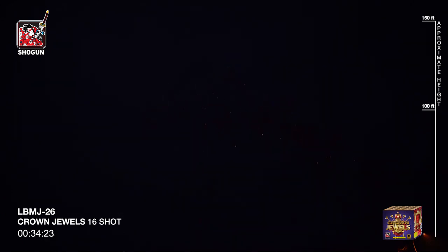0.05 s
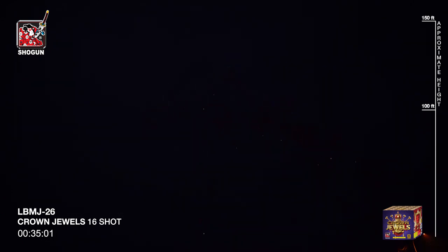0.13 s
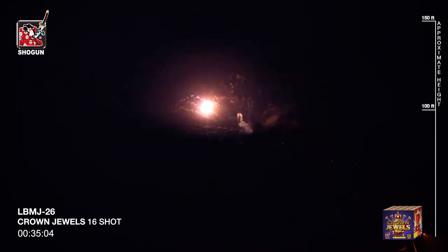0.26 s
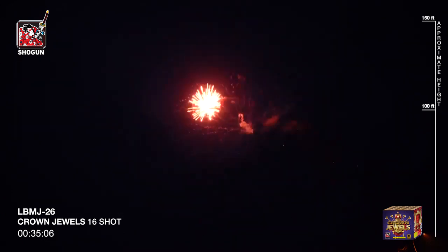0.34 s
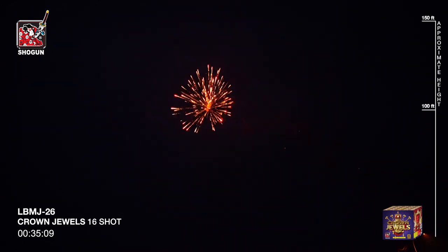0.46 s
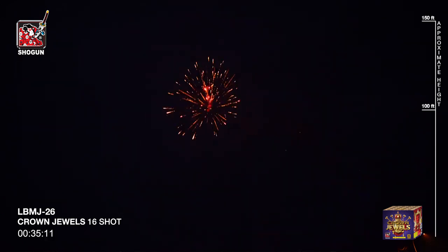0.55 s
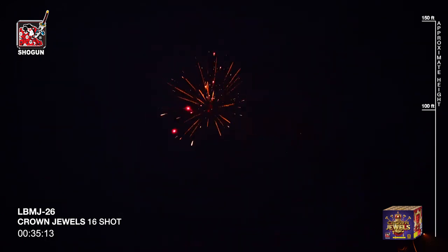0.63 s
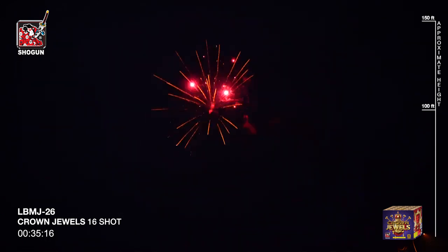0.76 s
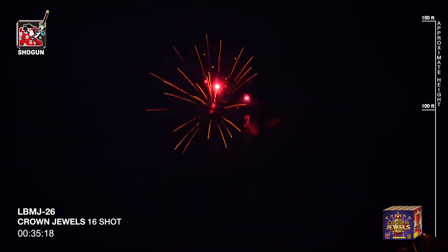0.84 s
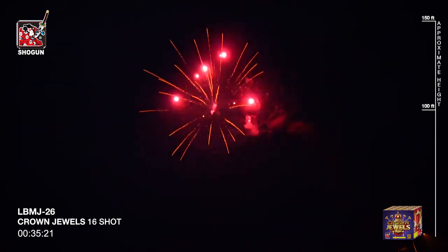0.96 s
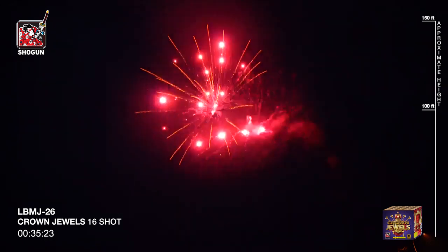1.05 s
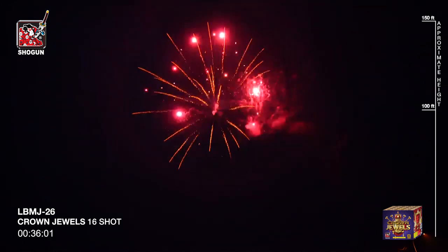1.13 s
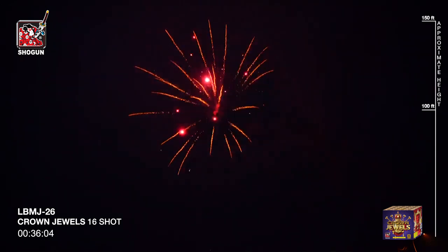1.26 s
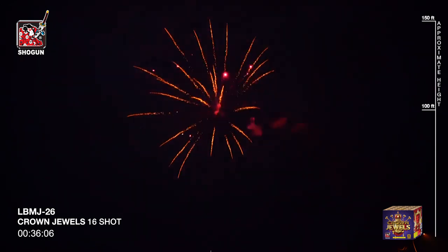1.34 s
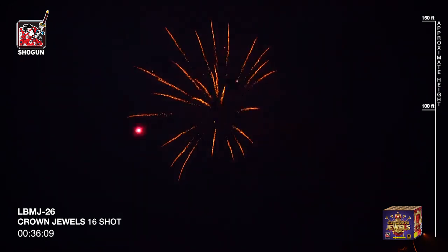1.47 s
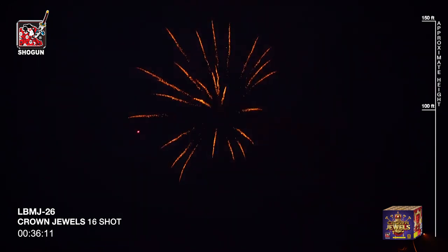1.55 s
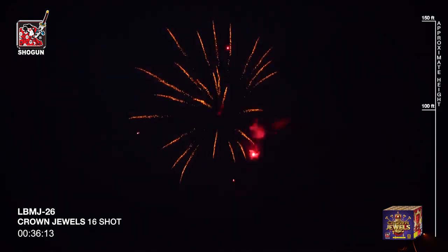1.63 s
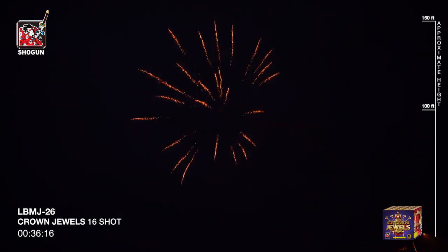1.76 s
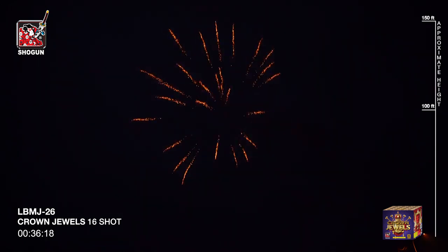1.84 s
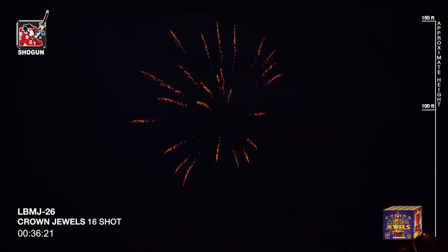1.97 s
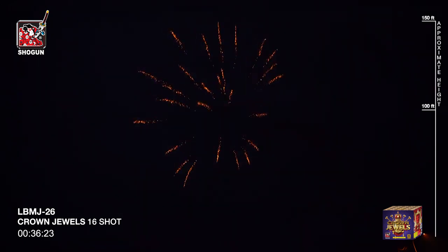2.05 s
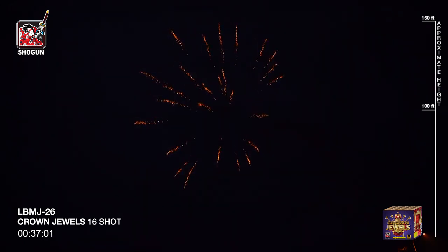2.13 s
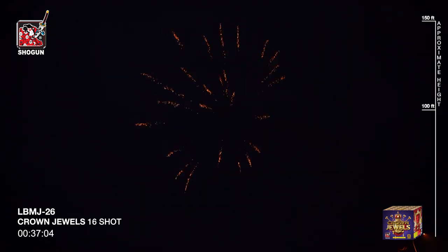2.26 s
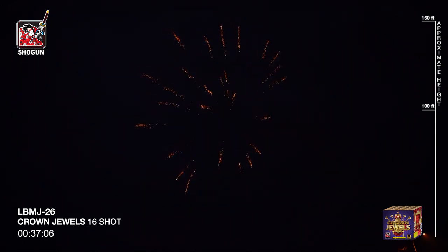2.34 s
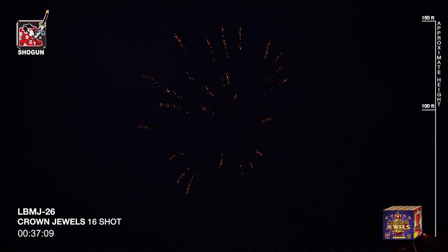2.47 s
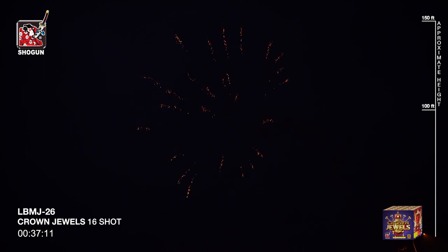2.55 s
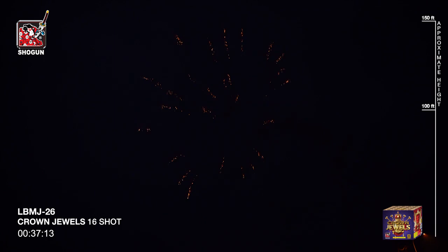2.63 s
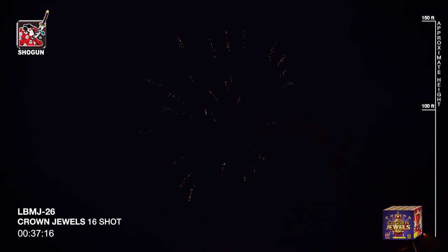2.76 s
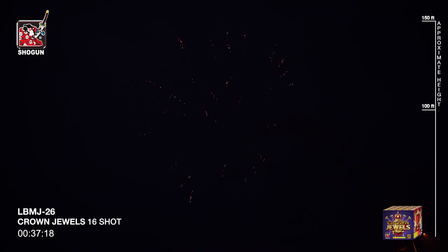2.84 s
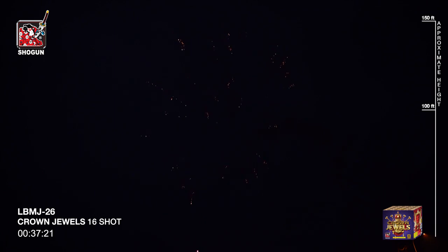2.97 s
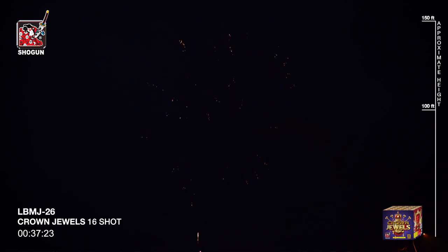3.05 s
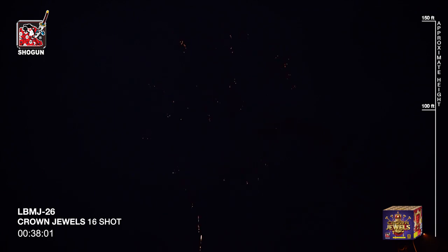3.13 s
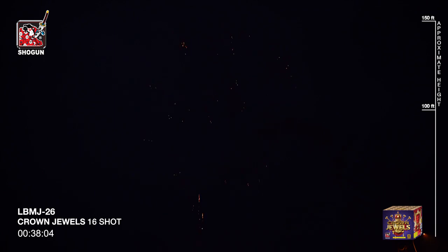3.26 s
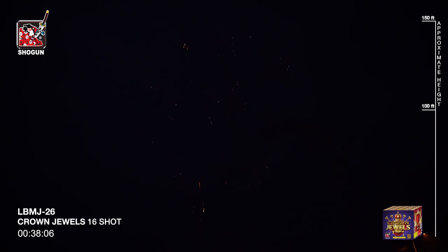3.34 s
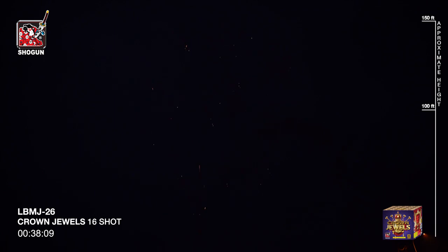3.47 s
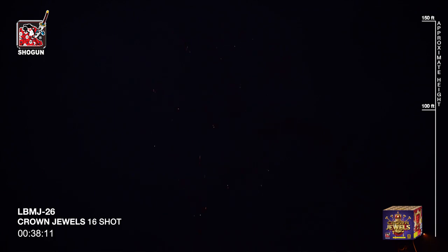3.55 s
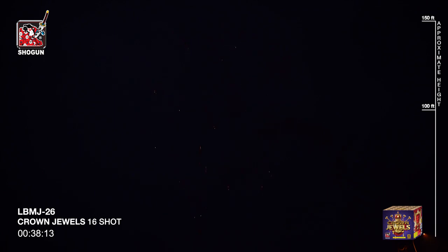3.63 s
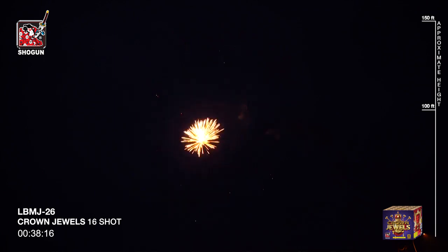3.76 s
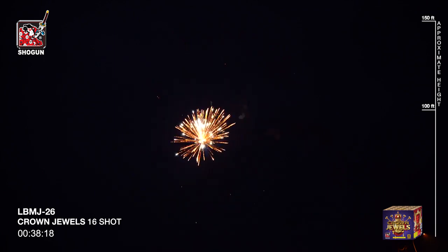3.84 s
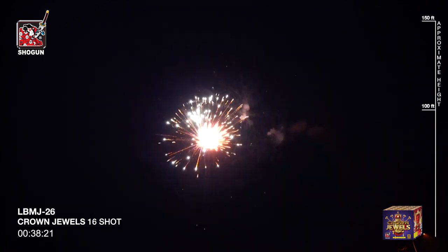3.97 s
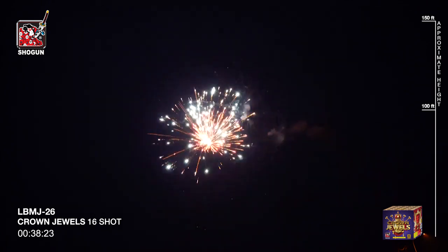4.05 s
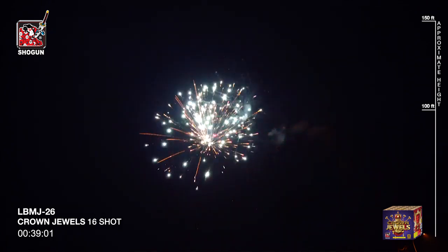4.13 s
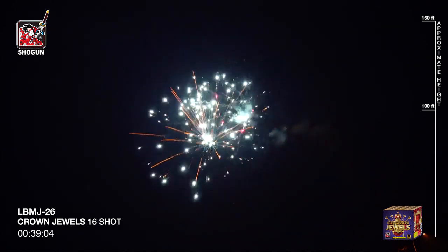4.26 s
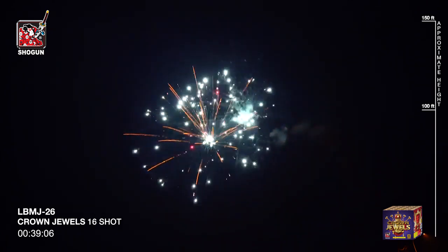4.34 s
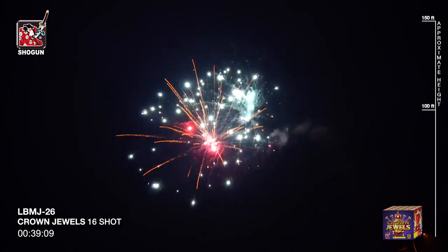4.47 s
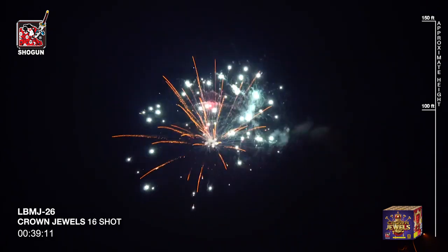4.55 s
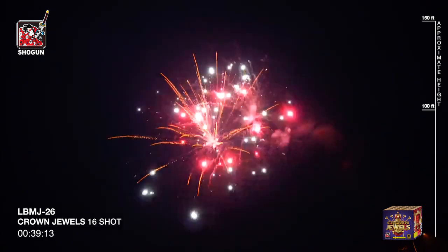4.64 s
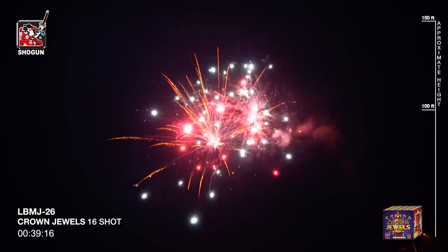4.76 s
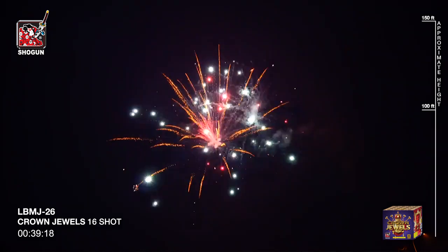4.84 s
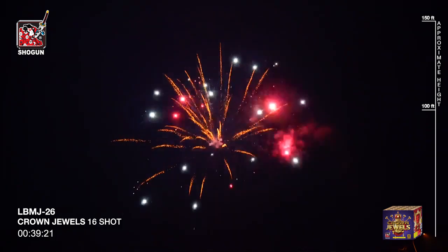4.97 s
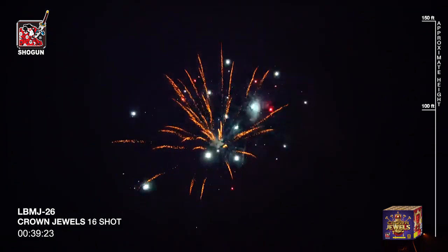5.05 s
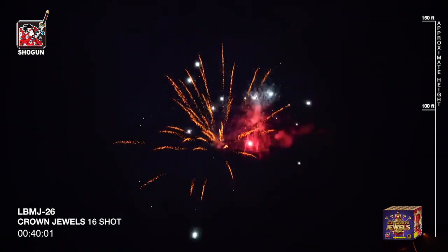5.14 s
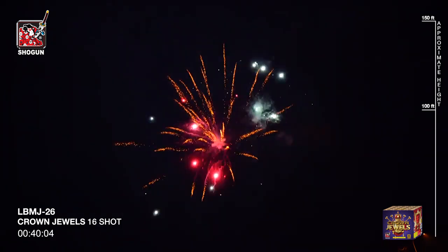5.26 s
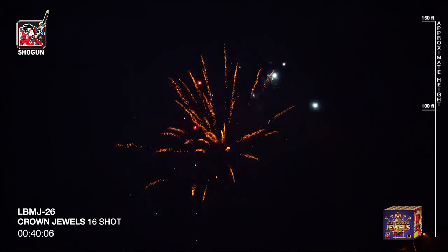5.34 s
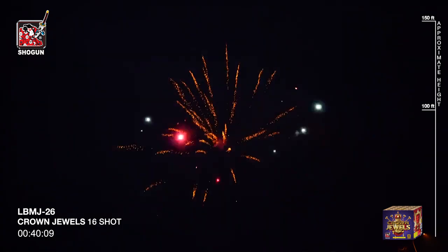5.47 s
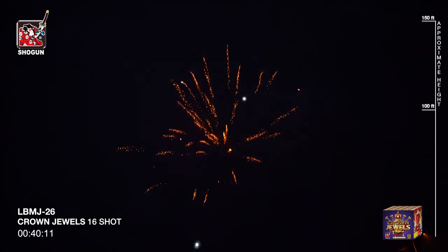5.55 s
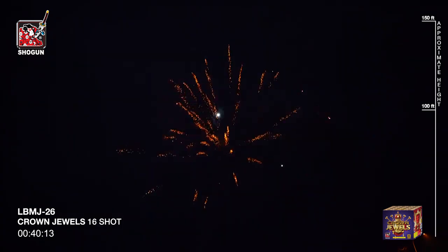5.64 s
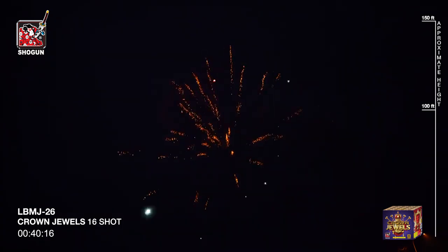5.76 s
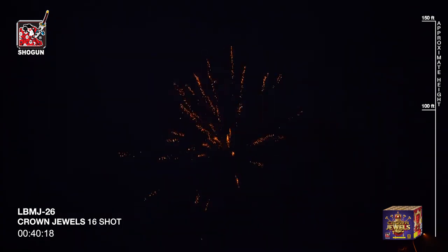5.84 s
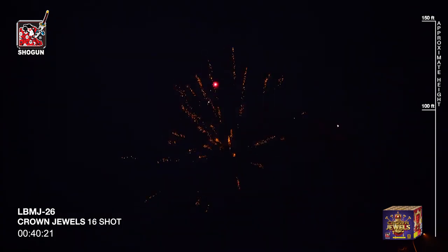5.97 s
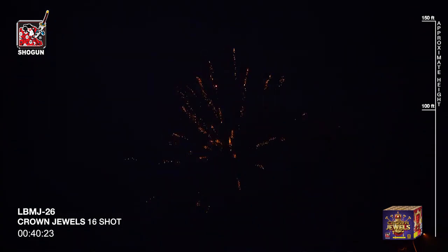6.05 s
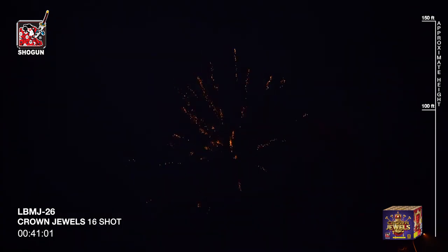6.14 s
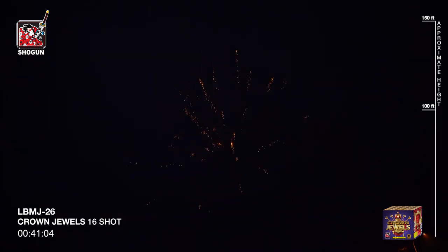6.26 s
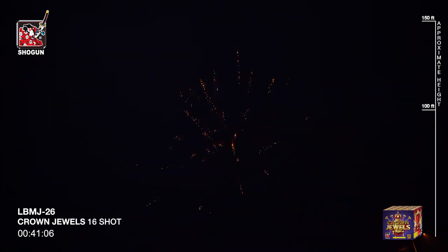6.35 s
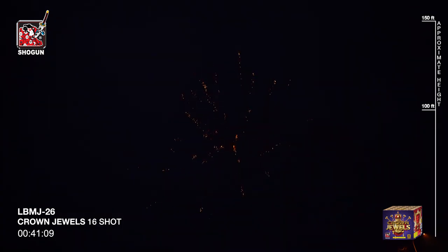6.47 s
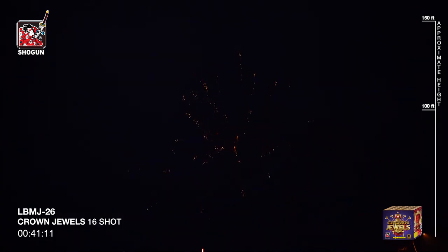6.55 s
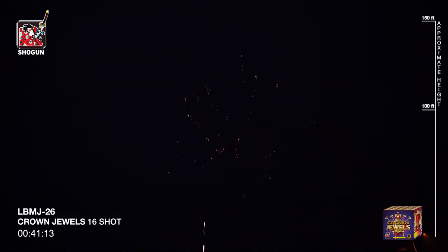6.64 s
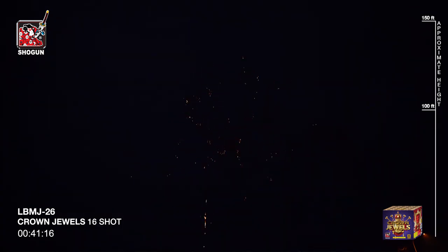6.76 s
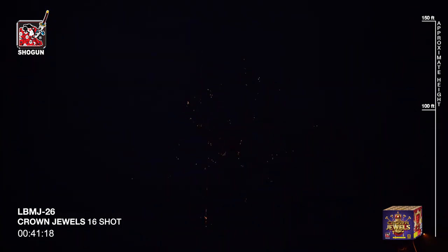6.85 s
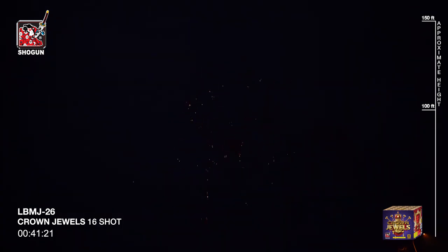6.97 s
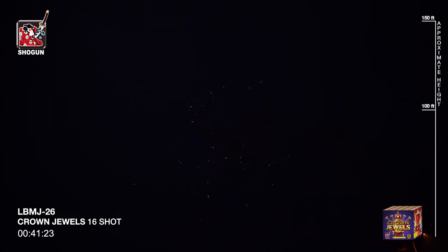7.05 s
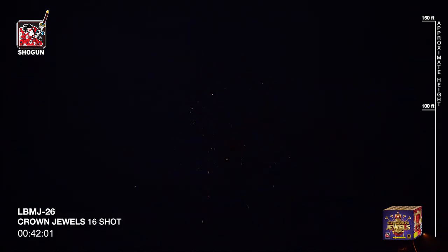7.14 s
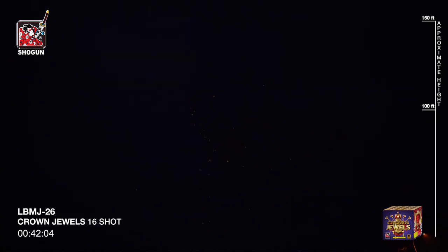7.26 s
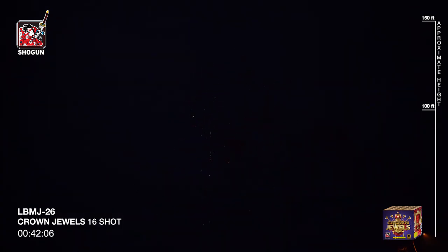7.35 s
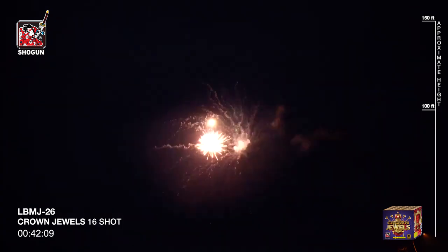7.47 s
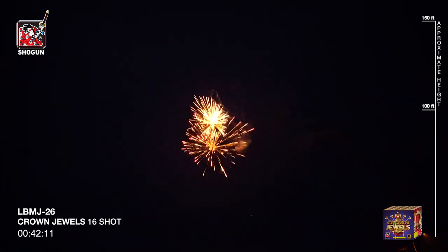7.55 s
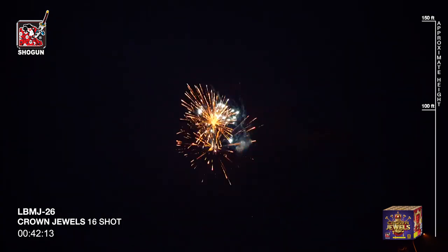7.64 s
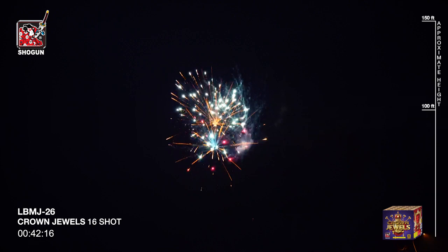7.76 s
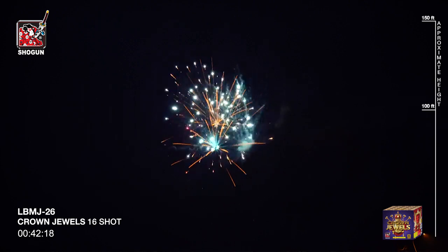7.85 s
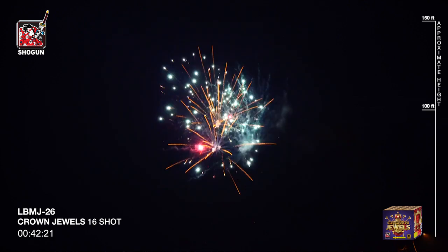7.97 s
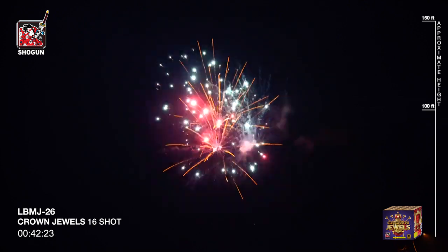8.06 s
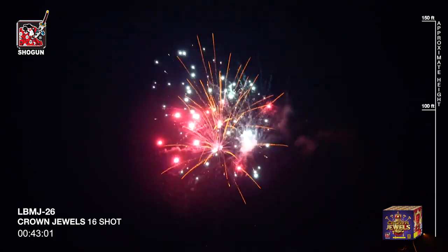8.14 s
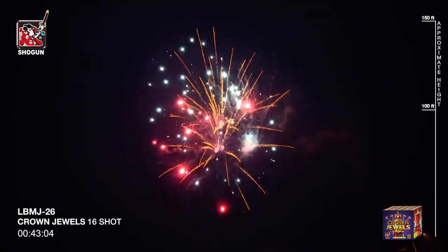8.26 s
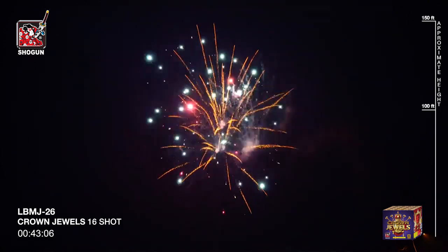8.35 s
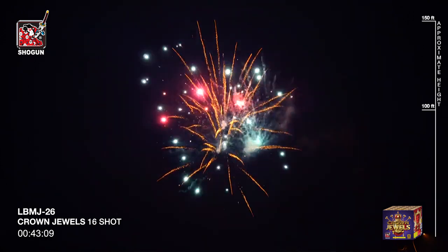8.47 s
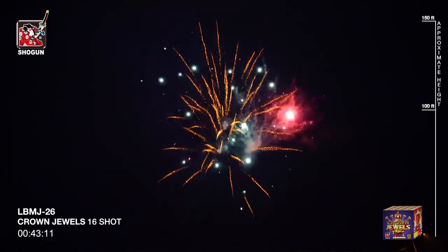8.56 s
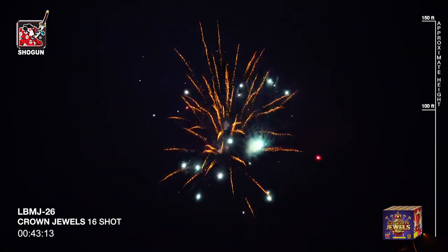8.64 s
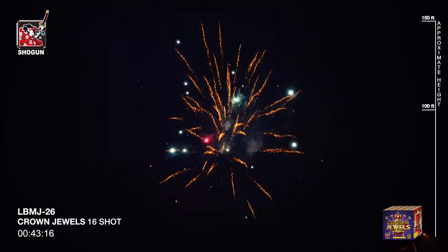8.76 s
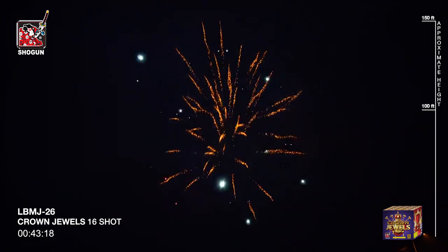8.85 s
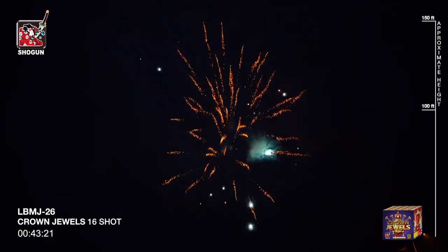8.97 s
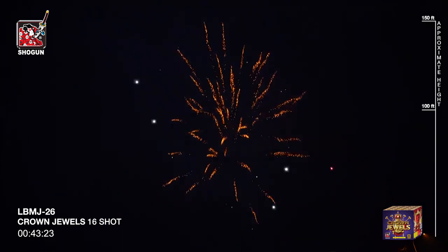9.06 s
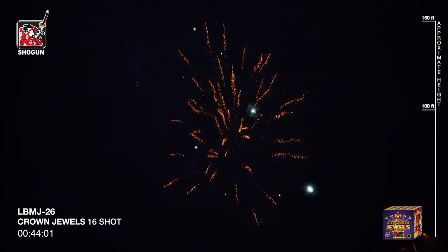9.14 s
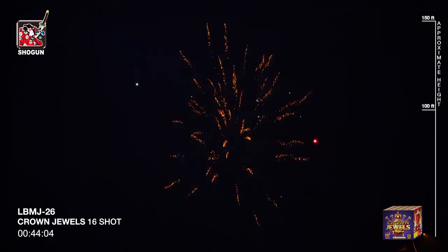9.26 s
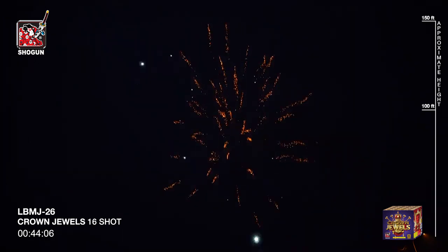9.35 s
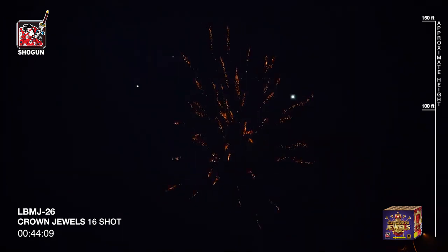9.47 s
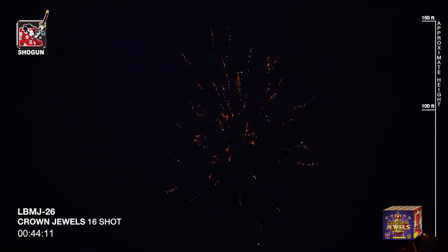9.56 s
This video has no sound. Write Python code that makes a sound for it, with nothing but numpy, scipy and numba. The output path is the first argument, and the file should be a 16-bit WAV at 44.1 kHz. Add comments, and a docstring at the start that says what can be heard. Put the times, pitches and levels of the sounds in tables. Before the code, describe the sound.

Outdoors at night, a soft dull wash, the dying tail of earlier shots, sinks beneath everything. At about 0.6 seconds a shell bursts overhead: a sharp crack with a heavy thump just behind it, quick slaps off nearby walls, then a rough echo from houses and trees that darkens over a second or so. Faint high sizzle flares around 1.4 to 2. Near 3.0 two launch charges crack in rapid succession, tighter and drier. Two shells bang at 4.0 and 4.2, their tails overlapping, followed by light sizzle and a small thin pop at 5.15. It grows quiet, with tiny fizzes near 6. Another double launch crack comes at 6.5, then two almost merged bursts at 7.7 and 7.8. Sizzle returns around 8.4 to 9, and low distant traffic remains until about 9.6. The close stereo microphone compresses the loud peaks.

```python
"""Open ground at night among houses and trees, a fireworks cake near a small stereo microphone.
Pairs of lift charges crack on the ground, shells burst overhead, a stray star pops late, stars sizzle.
Each blast is a damped pressure swing sent along a straight path, off a few near walls, then through
a long noise scatter that loses treble in the air. Sizzle and background (the dying tail of earlier shots
at first, then distant traffic) are coloured noise on level curves. The microphone limits the peaks."""
import sys
import numpy as np
from scipy import signal
from scipy.fft import rfft, irfft
from scipy.io import wavfile
from scipy.ndimage import uniform_filter1d
from numba import njit

SR = 44100
rng = np.random.default_rng(int(sys.argv[2]) if len(sys.argv) > 2 else 0)


def bounce(signal):
    """Save signal as a 16-bit WAV file at the path given by the first command-line argument."""
    frames = np.transpose(np.atleast_2d(signal))
    limited = np.clip(frames, -1, 1)
    pcm = np.round(limited * 32767).astype(np.int16)
    wavfile.write(sys.argv[1], SR, pcm)


N = 423801

# All levels are those ahead of the microphone's housing and limiter.
# Background level: the dying tail of earlier shots at first, then distant traffic, before it is panned.
# Each row: time in seconds, level in dB.
BACKGROUND_LEVEL = [(0, -36.5), (.25, -37), (.55, -39.5), (2.0, -45.5), (2.5, -47), (2.75, -43.5),
                    (2.97, -46), (3.9, -50.5), (5.5, -61.5), (6.0, -56.5), (6.5, -51), (7.3, -54),
                    (7.68, -47), (9.0, -47.5), (9.62, -45)]
# Colour of the background, only its shape counts. Each row: frequency in Hz, gain in dB.
BACKGROUND_COLOUR = [(18, -81), (30, -55), (100, -36), (165, -22.5), (231, -14), (410, -9.5), (439, -8),
                     (699, -7.5), (892, -2.5), (1770, -7), (3020, -15.5), (5000, -25), (7800, -40),
                     (11000, -54)]
# Burning stars that flare up and die.
# Each row: loudest at in seconds, level in dB, rise in dB per second, fall in dB per second.
STAR_FLARES = [(.45, -54, 3, 47), (1.37, -51.5, 90, 32), (1.52, -52.5, 40, 80), (1.65, -59, 300, 150),
               (1.71, -64.5, 300, 90), (1.94, -61.5, 25, 150), (2.05, -68.5, 60, 11), (5.05, -57.5, 60, 38),
               (5.62, -70, 117, 40), (5.85, -61.5, 50, 56), (5.995, -68, 900, 70), (6.22, -69, 900, 57),
               (8.37, -57, 86, 20), (8.63, -58.5, 30, 100), (8.78, -58, 102, 100), (9.1, -69, 25, 31)]
# Colour of the sizzle, only its shape counts. Each row: frequency in Hz, gain in dB.
STAR_COLOUR = [(1000, -23), (2500, -33), (5000, 1.5), (8000, -3), (11500, -9)]

# Shells bursting overhead, lift charges in the tubes, and a stray star popping late.
# Each row: start in seconds, level in dB, near scatter in dB, far scatter in dB,
# left minus right of the straight wave in dB.
SHELL_BURSTS = [(.5601, 2, 5, 4.5, 4), (3.9748, 2, 2, 1, 2.5), (4.2052, 1.5, 2.5, 0, 3),
                (7.7008, 2.5, -1.5, 1, 1.2), (7.7937, 3, -1.5, -0.5, 4)]
LIFT_CHARGES = [(2.9794, 5.5, 0.7, -1, 1.1), (3.0353, 1, 0, 2, 1.4), (6.5382, 4.6, -1.2, -3.5, .9),
                (6.5942, 0.45, -3, 0.5, .9)]
STRAY_POPS = [(5.1507, -4, -0.46, -.5, .3)]
# Ground and near walls; the first lift row is a thud carried by the soil, ahead of the air wave.
# Each row: delay after the straight wave in seconds, level against it in dB, treble edge in Hz.
BURST_REFLECTORS = [(.0021, -4, 3000), (.0085, -16, 3000), (0.0186, -6, 5000), (0.0212, -1, 2000),
                    (0.0228, -1.5, 2000), (.031, -13, 5000), (.051, 3.5, 4000), (.071, 0.5, 3000)]
LIFT_REFLECTORS = [(-.0036, -15, 700), (.0022, -11, 3000), (.0222, -6, 12000), (.0316, -4, 3000),
                   (.045, -6, 2000), (.062, -5, 5000), (.078, -8, 4000)]
POP_REFLECTORS = [(.003, -15, 4000), (0.017, -15, 5000), (0.024, -6, 3000), (0.033, -8, 4970)]
# Groups of houses and trees that scatter the blast back, before the near and far scatter levels.
# Each row: loudest at in seconds after the blast, level in dB, rise and fall in dB per second.
BURST_ECHO_GROUPS = [(.004, -20.5, 6000, 1500), (.055, -20, 285, 143), (.105, -22.5, 700, 402),
                     (.13, -29, 200, 51), (.45, -32.5, 53, 64.5), (.65, -45.5, 98, 15.5)]
LIFT_ECHO_GROUPS = [(.002, -30.5, 1300, 120), (.05, -23.5, 170, 350), (.1, -24.5, 330, 200),
                    (0.154, -24.5, 106, 62.6), (.55, -35.5, 20, 95), (.75, -45.5, 17, 21)]
POP_ECHO_GROUPS = [(.003, -31, 900, 1200), (.03, -35.5, 300, 80), (.25, -54, 100, 22)]
# Colour that the scattering adds. Each row: frequency in Hz, gain in dB.
BURST_ECHO_COLOUR = [(60, -3), (120, -5), (200, 2.5), (320, -1), (480, -5), (700, -6), (1100, 0), (1800, 2),
                     (3000, 5), (6000, 7.5), (11000, 11.5)]
LIFT_ECHO_COLOUR = [(60, -1), (120, -9), (200, 2.5), (320, 4.5), (480, 2.5), (700, 2), (1100, 0),
                    (1800, -4.5), (3000, -2), (6000, 0.5), (11000, 2.5)]
POP_ECHO_COLOUR = [(300, -9), (800, 5), (2000, -5), (5000, 7.5), (11000, 10.5)]
# Loss on the longer paths, before each kind of blast scales it.
# Each row: frequency in Hz, loss in dB per second of delay.
PATH_LOSS = [(60, -1.5), (150, 3), (400, 0.5), (1000, -0.5), (2500, 1), (5000, 12.5), (8000, 30),
             (11500, 49)]

# Microphone response to the blasts. Each row: frequency in Hz, gain in dB.
MIC_RESPONSE = [(25, -24), (60, -20), (120, -10), (200, -2), (450, -1), (1000, -2), (2000, -4), (4000, -8),
                (8000, -13.5), (11500, -17)]
# Likeness of left and right for diffuse sound. Each row: frequency in Hz, likeness from 0 to 1.
CHANNEL_LIKENESS = [(60, 1), (270, 1), (580, 0.93), (1200, 0.68), (2600, 0.4), (5500, 0.017), (11000, 0.19)]
# Dips and bumps from the housing and the ground under it. Each row: frequency in Hz, gain in dB.
HOUSING_RESPONSE = [(120, -1), (146, 3.5), (170, -6.5), (196, 2.5), (214, 0.5), (240, 2.5), (400, 0.5),
                    (473, 2), (560, -.5), (1150, 0), (1480, -2), (1900, 2), (2250, -1.5), (3000, 0.5)]

TAIL = 3 * SR  # samples of scatter after each blast
FRAME = 512  # samples: noise-colouring window, blast wave length and room ahead of the straight wave
FAR_S = 0.45  # delay in seconds from which the scatter counts as fully far
BACKGROUND_PAN_DB, BACKGROUND_LAG = -2.1, 3  # left minus right in dB, left late in samples
FAR_PAN_DB = -0.75  # left minus right; the far reflectors lie to the right
# Ball of hot gas: swing period in ms, swings until it fades to 1 / e.
BURST_GAS, LIFT_GAS, POP_GAS = (2.0, .44), (.66, .3), (.42, .27)
LAG_HZ, LAG_Q = 333, .3  # where the bass starts to lag, and how sharply
TOP_HZ = 11000  # upper edge of what the microphone passes on


def undb(db):
    """Gain of a level in dB."""
    return 10 ** (np.asarray(db) / 20)


def over_hz(table, hz):
    """Read a (Hz, value) table on a log-frequency axis."""
    table_hz, values = np.transpose(table)
    return np.interp(np.log(np.maximum(hz, 1)), np.log(table_hz), values)


def over_s(table, count):
    """Gain of a (s, dB) curve at every sample, silent outside it."""
    s, db = np.transpose(table)
    return undb(np.interp(np.arange(count) / SR, s, db, left=-200, right=-200))


def swells(table, count):
    """Gain of overlapping swells, each rising and falling at its own steady rate; their powers add."""
    t = np.arange(count) / SR
    power = np.zeros(count)
    for peak_s, db, rise, fall in table:
        drop = np.maximum(rise * (peak_s - t), fall * (t - peak_s))
        power += undb(2 * (db - drop))
    return np.sqrt(power)


def sides(db):
    """Left and right gains of a left-minus-right difference."""
    return undb(np.array([[db], [-db]]) / 2)


def walk(rate, count):
    """Random levels held about 1 / rate s and slewed; spread near 1."""
    hold = int(SR / rate) + 1
    steps = np.repeat(rng.standard_normal(count // hold + 1), hold)
    return uniform_filter1d(steps, hold)[:count]


def diffuse(count, tint, grain_db, grain_hz, loss=0.):
    """Stereo noise from all around, of the given colour; loss dulls it with time, grain makes it lumpy."""
    noise = rng.standard_normal((2, count)) * undb(grain_db * walk(grain_hz, count))
    hz, s, (mid, side) = signal.stft(noise, SR, nperseg=FRAME)
    # the balance of middle and side sets how alike left and right are
    alike = np.clip(over_hz(CHANNEL_LIKENESS, hz), 0, 1)[:, None]
    mid = mid * np.sqrt((1 + alike) / 2)
    side = side * np.sqrt((1 - alike) / 2)
    loss_db = loss * np.outer(over_hz(PATH_LOSS, hz), s)
    gain = undb(over_hz(tint, hz)[:, None] - loss_db)
    stereo = np.array([mid + side, mid - side])
    return signal.istft(gain * stereo, SR, nperseg=FRAME)[1][:, :count]


def steady(gain, tint, grain_db, grain_hz):
    """Coloured noise brought to unit level, then made to follow a gain curve."""
    noise = diffuse(N, tint, grain_db, grain_hz)
    return noise / np.std(noise) * gain


def distant_background():
    """Tail of earlier shots, then traffic: one diffuse noise, stronger and slightly earlier on the right."""
    hum = steady(over_s(BACKGROUND_LEVEL, N), BACKGROUND_COLOUR, grain_db=2.35, grain_hz=11.0)
    left, right = hum * sides(BACKGROUND_PAN_DB)
    return np.array([np.roll(left, BACKGROUND_LAG), right])


def burning_stars():
    """Sizzle of burning stars: grainy diffuse noise that swells and dies with each flare."""
    return steady(swells(STAR_FLARES, N), STAR_COLOUR, grain_db=2.5, grain_hz=40.)


def blast_wave(gas):
    """A pressure jump; then the ball of hot gas swings back and forth and fades."""
    period_ms, fade_swings = gas
    swings = 1000 * np.arange(FRAME) / SR / period_ms
    return -np.cos(2 * np.pi * swings) * np.exp(-swings / fade_swings)


def scattered_paths(groups, tint, near_db, far_db, grain_db, lump_db, loss):
    """Scatter from houses and trees: noise as a dense train of echoes, duller with delay."""
    far = np.minimum(np.arange(TAIL) / SR / FAR_S, 1)
    # single reflectors stand out as grains
    paths = diffuse(TAIL, tint, grain_db, grain_hz=2500., loss=loss)
    # groups of reflectors stand out as lumps, which blend as the echoes crowd
    paths *= undb(lump_db * (1 - .4 * far) * walk(150, TAIL))
    level_db = near_db + (far_db - near_db) * far
    pan_db = np.outer([.5, -.5], FAR_PAN_DB * far)
    return paths * undb(level_db + pan_db) * swells(groups, TAIL)


def add_walls(paths, walls):
    """Near reflectors: a rough wall smears the wave and so dulls it."""
    t = np.arange(FRAME) / SR
    for lag, wall_db, edge_hz in walls:
        smear = np.exp(-2 * np.pi * edge_hz * t)
        first = FRAME + int(lag * SR)
        paths[:, first:first + FRAME] += undb(wall_db) * smear / smear.sum()


def blasts(table, gas, walls, groups, tint, grain_db, lump_db, loss):
    """Every blast wave travels the straight path, the walls and a scatter of its own."""
    out = np.zeros((2, N + TAIL))
    wave = blast_wave(gas)
    for start_s, db, near_db, far_db, pan_db in table:
        paths = scattered_paths(groups, tint, near_db, far_db, grain_db, lump_db, loss)
        # room ahead of the straight wave for what the soil carries
        paths = np.pad(paths, ((0, 0), (FRAME, 0)))[:, :TAIL]
        paths[:, FRAME:FRAME + 1] += sides(pan_db)
        add_walls(paths, walls)
        start = int(start_s * SR) - FRAME
        heard = signal.fftconvolve(paths, wave[None])[:, :TAIL]
        out[:, start:start + TAIL] += undb(db) * heard
    return out[:, :N]


def shell_bursts():
    """Shells overhead: the slowest gas swing gives the deepest blast."""
    return blasts(SHELL_BURSTS, BURST_GAS, BURST_REFLECTORS, BURST_ECHO_GROUPS, BURST_ECHO_COLOUR,
                  grain_db=2.5, lump_db=1.0, loss=0.91)


def lift_charges():
    """Pairs of charges in the tubes: a quick gas swing cracks, the soil carries a thud ahead."""
    return blasts(LIFT_CHARGES, LIFT_GAS, LIFT_REFLECTORS, LIFT_ECHO_GROUPS, LIFT_ECHO_COLOUR,
                  grain_db=2.5, lump_db=2.0, loss=1.15)


def stray_pop():
    """A stray star popping late: the shortest gas swing, with a thin scatter."""
    return blasts(STRAY_POPS, POP_GAS, POP_REFLECTORS, POP_ECHO_GROUPS, POP_ECHO_COLOUR,
                  grain_db=0.0, lump_db=1.5, loss=0.95)


def causal(table, size=4096):
    """Shortest causal response with the table's gain, from the folded cepstrum."""
    hz = np.arange(size // 2 + 1) * SR / size
    cepstrum = irfft(over_hz(table, hz) * np.log(10) / 20)
    cepstrum[1:size // 2] *= 2
    cepstrum[size // 2 + 1:] = 0
    return irfft(np.exp(rfft(cepstrum)))


def coloured(x, table):
    """Sound passed through the causal response of a (Hz, dB) table."""
    return signal.fftconvolve(x, causal(table)[None])[:, :N]


def late_bass(x):
    """An all-pass: the treble of each crack leads, the thump follows."""
    w = 2 * np.pi * LAG_HZ / SR
    width = np.sin(w) / 2 / LAG_Q
    poles = [1 + width, -2 * np.cos(w), 1 - width]
    return signal.lfilter(poles[::-1], poles, x)


@njit
def limit(x, top, ratio, attack, release):
    """Gain control: both channels turn down together when the envelope passes the top."""
    y, envelope = np.empty_like(x), 0.
    for i in range(x.shape[1]):
        peak = max(abs(x[0, i]), abs(x[1, i]))
        # attack and release are the shares of the gap closed per sample
        envelope += (peak - envelope) * (attack if peak > envelope else release)
        y[:, i] = x[:, i] * min(1., (top / (envelope + 1e-9)) ** (1 - 1 / ratio))
    return y


def scene():
    """Bursts, lifts and the late pop over burning stars and the distant background."""
    background = distant_background() + burning_stars()
    shots = shell_bursts() + lift_charges() + stray_pop()
    # the microphone thins the bass and treble of the blasts
    return background + coloured(shots, MIC_RESPONSE)


def record(dry):
    """The housing colours the sound and the bass comes late; a limiter holds the blasts; the top is cut."""
    heard = late_bass(coloured(dry, HOUSING_RESPONSE))
    held = limit(heard, 0.36, 2.66, 0.06, 0.0011)
    # the sharpest tips are rounded
    rounded = 0.78 * np.tanh(held / 0.83)
    # the deepest rumble is dropped
    lean = signal.lfilter(*signal.butter(2, 45, "high", fs=SR), rounded)
    return signal.sosfilt(signal.ellip(16, .3, 75, TOP_HZ, fs=SR, output="sos"), lean)


dry = scene()
out = record(dry)
bounce(out)
```